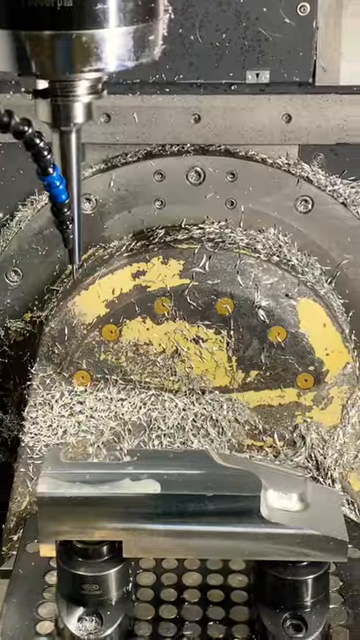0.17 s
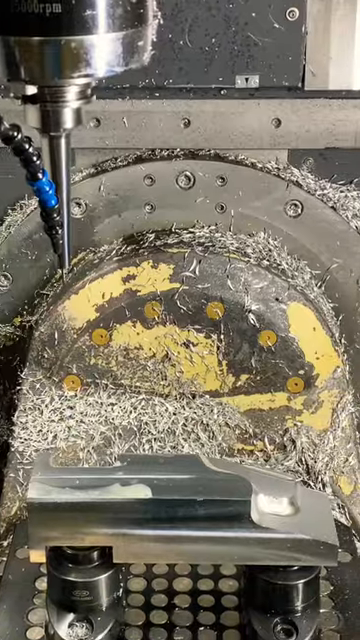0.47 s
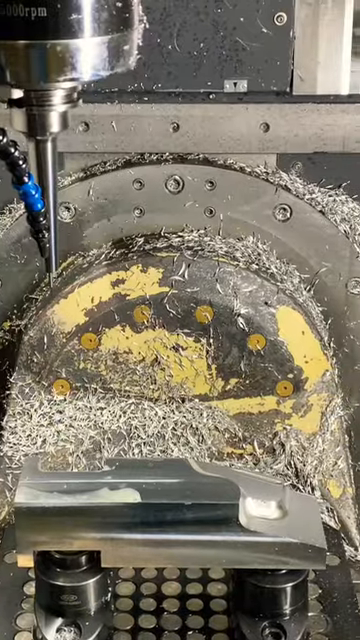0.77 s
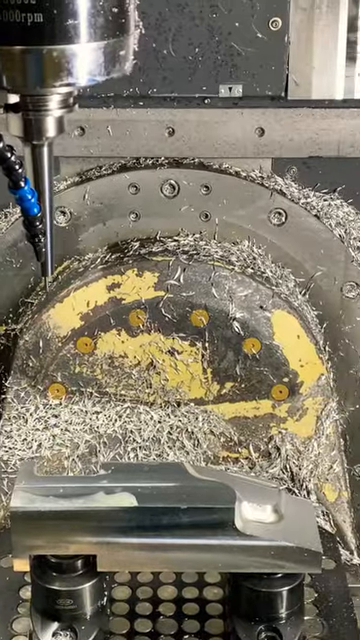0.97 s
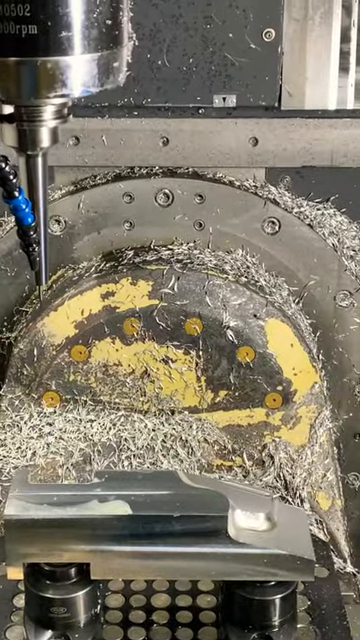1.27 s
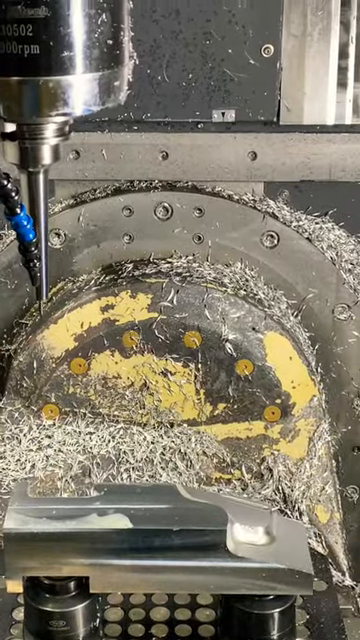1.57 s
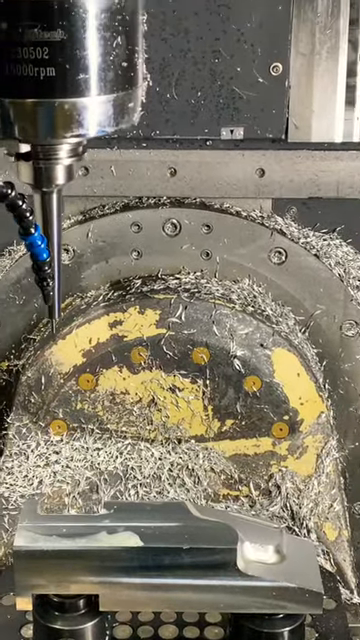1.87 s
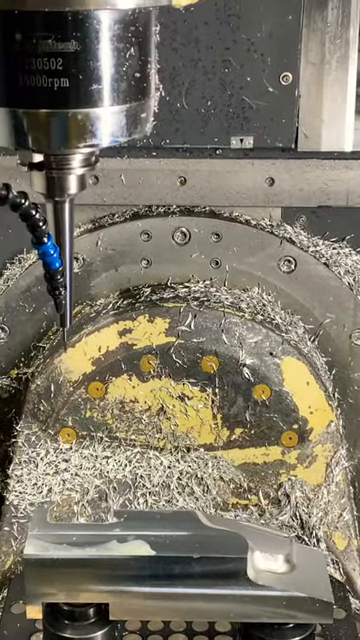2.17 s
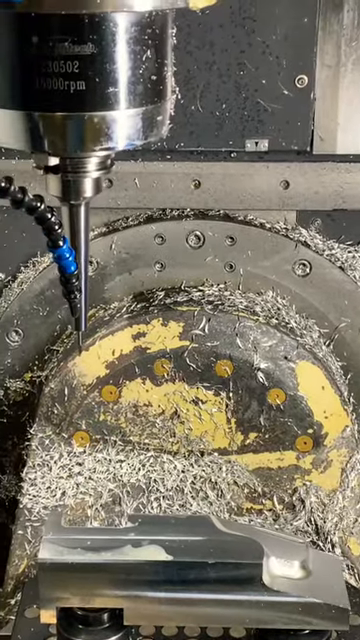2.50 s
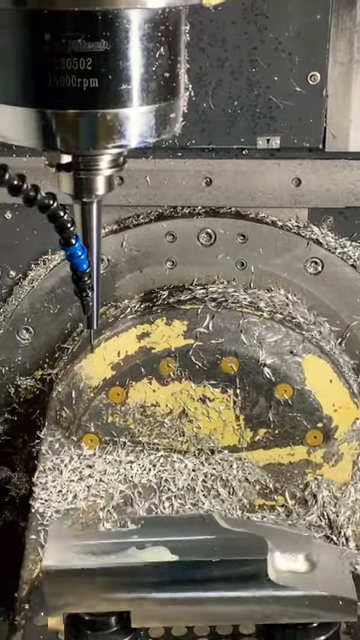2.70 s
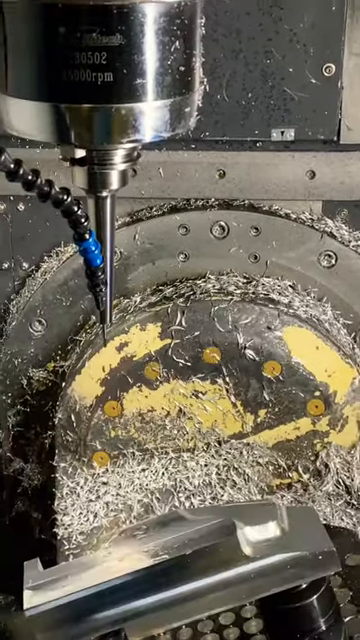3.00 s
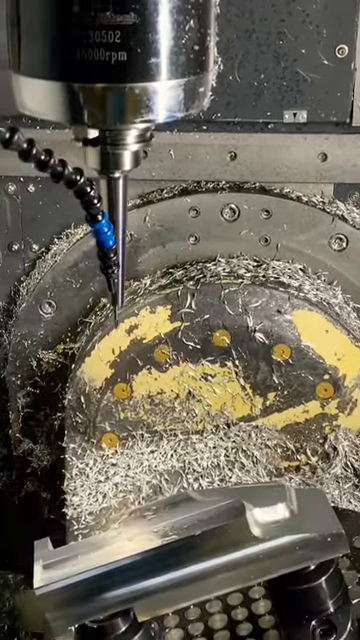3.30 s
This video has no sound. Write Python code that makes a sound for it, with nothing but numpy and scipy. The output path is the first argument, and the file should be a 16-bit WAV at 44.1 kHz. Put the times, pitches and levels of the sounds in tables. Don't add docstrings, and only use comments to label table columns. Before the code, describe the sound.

An air nozzle blows a constant bright hiss at a spinning tool inside a steel machine enclosure; motors hum and the frame rumbles below, with faint high whistles, heard close in stereo.

```python
import sys
import numpy as np
from scipy import signal
from scipy.fft import rfft, irfft, next_fast_len
from scipy.io import wavfile
from scipy.ndimage import uniform_filter1d, map_coordinates

SR = 44100
rng = np.random.default_rng(int(sys.argv[2]) if len(sys.argv) > 2 else 0)


def boost(x):
    u = np.asarray(x, float) / 20
    return 10 ** u


def bounce(signal):
    frames = np.transpose(np.atleast_2d(signal))
    limited = np.clip(frames, -1, 1)
    pcm = np.round(limited * 32767).astype(np.int16)
    wavfile.write(sys.argv[1], SR, pcm)


N = 152145


def unit(x):
    return x / np.sqrt(np.mean(x ** 2) + 1e-20)


def along(points, hz):
    f, v = np.transpose(points)
    return np.interp(np.log(hz + 1), np.log(f + 1), v)


def over_time(rows):
    s, value = np.transpose(rows)
    return np.interp(np.arange(N) / SR, s, value)


def wobble(knots_per_s):
    return map_coordinates(rng.standard_normal(400), [np.arange(N) * knots_per_s / SR])


def filtered(x, response):
    m = next_fast_len(N + 8192)
    return irfft(rfft(x, m) * response(np.fft.rfftfreq(m, 1 / SR)), m)[..., :N]


def patchy(depth_db, channels):
    z = signal.stft(rng.standard_normal((channels, N)), nperseg=512)[2]
    field = uniform_filter1d(rng.standard_normal(z.shape[1:]), size=6, axis=0)
    field = uniform_filter1d(field, size=10, axis=1)
    return signal.istft(z * boost(depth_db * unit(field)), nperseg=512)[1][:, :N]


def likeness_angle(alike):
    return np.arccos(np.clip(alike, -1, 1)) / 2


def narrow(centre_hz, width_hz, alike):
    def ring(hz):
        damping = 1j * hz * width_hz
        return (damping / (centre_hz ** 2 - hz * hz + damping)) ** 2

    a, b = filtered(rng.standard_normal((2, N)), ring)
    angle = likeness_angle(alike)
    mid, side = np.cos(angle) * a, np.sin(angle) * b
    return unit(np.array([mid + side, mid - side]))


def sine(hz):
    return np.sqrt(2) * np.sin(2 * np.pi * np.cumsum(hz + np.zeros(N)) / SR)


def standing(depth_db, channels):
    field = uniform_filter1d(rng.standard_normal((channels, 2400)), size=3, axis=1)
    gain = boost(depth_db * unit(field))
    return lambda hz: np.array([np.interp(hz, np.arange(2400) * 10, row) for row in gain])


def nozzle_lift(hz):
    # centre_hz, width_hz, lift_db
    resonances = [(1380, 74, 5.5), (3330, 380, 4.5), (5200, 990, 0), (6740, 830, 5.5), (8450, 150, 5),
                  (10110, 400, 0.5), (14300, 340, 1.5)]
    return boost(sum(db / (1 + (2 * (hz - c) / w) ** 2) for c, w, db in resonances))


def at_ports(x):
    # hz, left_lag_turns
    port_lag = [(6000, -.2), (7000, 0), (8000, .33), (8850, .47), (9650, .53), (10350, .93), (11700, 1.075),
                (12400, 1.38), (13000, 1.475), (13750, 1.525), (14450, 1.85), (15100, 1.98), (16000, 2.02)]
    late = filtered(x, lambda hz: np.exp(-2j * np.pi * np.interp(hz, *np.transpose(port_lag))))
    return np.array([late, x])


def direct_jet(fine):
    # hz, level_db_per_hz
    jet_spectrum = [(4500, -120), (5800, -20), (6900, -7), (7600, -1.5), (9000, 0), (11000, 1.5),
                    (14000, 3.5), (17000, -4.5)]
    sway_s = 1.2e-6
    noise = patchy(1.0, channels=1)[0]
    jet = unit(filtered(noise, lambda hz: boost(along(jet_spectrum, hz)) * nozzle_lift(hz) * fine(hz)[0]))
    late = at_ports(jet)[0]
    late = map_coordinates(late, [np.arange(N) - sway_s * wobble(6.1) * SR], order=5, mode="nearest")
    return boost(-25) * np.array([late, jet])


def tool_glance(fine):
    # hz, level_db_per_hz
    glance_spectrum = [(500, -120), (800, -11.5), (1500, -20.5), (2300, -6), (2700, -8), (4200, -6.5),
                       (5300, 5.5), (6800, -27)]
    lag_s, in_phase_hz, lean_db = 0.000508, 4295, 2.5
    noise = patchy(2.5, channels=1)[0]
    glance = unit(filtered(noise, lambda hz: boost(along(glance_spectrum, hz)) * fine(hz)[0]))
    slant = filtered(glance, lambda hz: np.exp(-2j * np.pi * (hz - in_phase_hz) * lag_s))
    return boost(-36) * np.array([boost(lean_db) * slant, glance])


def enclosure_wash():
    # hz, level_db_per_hz
    wash_spectrum = [(300, -120), (500, -7), (1200, -10.5), (2500, -7), (4100, -4.5), (5500, -0.5),
                     (8300, -5), (9000, -5.5)]
    # hz, left_over_right_db
    wash_lean = [(400, 2.5), (1100, 5), (2500, 1), (4200, 1.8), (5300, 2.5), (8500, 4.5), (10000, -3)]
    falls_above_hz, fall_db_per_octave = 8500, 26
    modes = standing(2.1, channels=2)

    def response(hz):
        fall_db = fall_db_per_octave * np.log2(np.maximum(hz / falls_above_hz, 1))
        lean_db = np.outer([.5, -.5], along(wash_lean, hz))
        return boost(along(wash_spectrum, hz) - fall_db + lean_db) * nozzle_lift(hz) * modes(hz)

    return boost(-28.5) * unit(filtered(patchy(0.42, channels=2), response))


def air():
    # time_s, flow_db
    air_flow = [
        (0.04, -28.5),
        (0.11, -30),
        (2.72, -30),
        (2.73, -29),
        (3.34, -31),
        (3.45, -29),
    ]
    flow_db = over_time(air_flow)
    flow = boost(flow_db - flow_db.mean() + 0.13 * wobble(7.09) + 0.26 * wobble(35.28))
    fine = standing(1.9, channels=1)
    return flow * (direct_jet(fine) + tool_glance(fine) + enclosure_wash())


def hums():
    # centre_hz, width_hz, level_db, left_over_right_db
    hum_lines = [(73.6, 11.6, -42.5, 0), (146.3, 23, -45.5, 5), (173.1, 11, -47.5, 10),
                 (369.7, 50, -51, 10), (47.6, 11, -47, 1), (438, 59, -52, 3.5), (722, 77, -52.5, 1.5),
                 (993, 46, -56.5, 3)]
    out = np.zeros((2, N))
    for hz, width_hz, db, lean_db in hum_lines:
        gain = boost(db + np.array([[.5], [-.5]]) * lean_db)
        out += gain * narrow(hz, width_hz, alike=1 - (hz / 900) ** 1.3)
    return out


def frame_rumble():
    # hz, level_db_per_hz
    rumble_spectrum = [(18, -120), (30, -2), (45, -6), (100, 0.5), (200, -8.5), (380, -5), (550, -18.5),
                       (1500, -15.5)]
    # hz, left_right_likeness
    rumble_alike = [(30, .999), (60, 1), (140, .85), (330, 0.45), (600, 0.3)]

    def response(hz):
        angle = likeness_angle(along(rumble_alike, hz))
        return boost(along(rumble_spectrum, hz)) * [np.cos(angle), np.sin(angle)]

    mid, side = filtered(patchy(0.81, channels=2), response)
    return boost(-36) * unit(np.array([mid + side, mid - side])) * boost([[.4], [-.4]])


def panel_boom():
    # centre_hz, width_hz, level_db
    panel_modes = [(236.5, 22.5, -37), (256.2, 36, -37.5), (282, 23.5, -45.5), (302.4, 19, -55.5)]
    # time_s, drive_db
    panel_drive = [(0.04, -39), (0.07, -26.5), (0.18, -38), (0.3, -26.5), (0.63, -42), (0.72, -25),
                   (0.75, -57), (0.81, -37.5), (1.96, -34.5), (2.11, -42.5), (2.32, -26), (2.39, -53),
                   (2.53, -32), (2.98, -40), (3.04, -20), (3.07, -36), (3.42, -33.5), (3.45, -55)]
    evened_out = 0.74
    drive_db = over_time(panel_drive)
    modes = sum(boost(db) * narrow(hz, width_hz, alike=.94) for hz, width_hz, db in panel_modes)
    power = uniform_filter1d((modes ** 2).mean(0), size=3000)
    beating = unit(np.sqrt(np.abs(uniform_filter1d(power, size=3000))))
    swell = boost(0.63 * (drive_db - drive_db.mean()) + 1.47 * wobble(11))
    return swell * modes / (beating + 0.041) ** evened_out


def main_motor():
    level = boost(-39.5 + 2 * wobble(8.76))
    return level * sine(127.8 + 3.35 * wobble(16)) * boost([[.9], [-.9]])


def gears():
    # hz, level_db
    gear_lines = [(624, -63), (814, -61), (2222, -61), (3148, -62), (3715, -61)]
    lines = sum(boost(db + 1.5 * wobble(5.05)) * sine(hz + 6 * wobble(9)) for hz, db in gear_lines)
    return lines * boost([[1.5], [-1.5]])


def nozzle_whistles():
    # start_s, end_s, centre_hz, width_hz, level_db
    edge_tones = [
        (0, 2.8, 14215, 50, -40.5),
        (3.0, 3.36, 14712, 15, -45),
        (1.4, 3.2, 15135, 30, -47),
        (0, 3.6, 10385, 50, -47),
        (0, 2, 5300, 90, -44),
    ]
    t = np.arange(N) / SR
    out = np.zeros((2, N))
    for start_s, end_s, hz, width_hz, db in edge_tones:
        fade = np.clip(np.minimum(t - start_s, end_s - t) / 0.13, 0, 1)
        out += boost(db) * fade * at_ports(narrow(hz, width_hz, alike=0.93)[0])
    return out


def feed_motor():
    start_s, lasts_s, from_hz, to_hz = 2.69, .17, 720, 890
    u = np.clip((np.arange(N) / SR - start_s) / lasts_s, 0, 1)
    level = boost(-47.5 + 2.6 * wobble(44)) * np.sin(np.pi * u)
    return level * sine(from_hz + (to_hz - from_hz) * u + 60 * wobble(90)) * boost([[1.5], [-1.5]])


def scene():
    machine = hums() + frame_rumble() + panel_boom() + main_motor() + gears()
    return air() + machine + nozzle_whistles() + feed_motor()


def top_cut(x):
    return signal.sosfilt(signal.butter(12, 17090, fs=SR, output="sos"), x)


def record(dry):
    start_s, open_s, top_hz = .0362, .0004, 15750
    gate = np.clip((np.arange(N) / SR - start_s) / open_s, 0, 1)
    return top_cut(gate * filtered(dry, lambda hz: hz < top_hz))


dry = scene()
out = record(dry)
bounce(out)
```